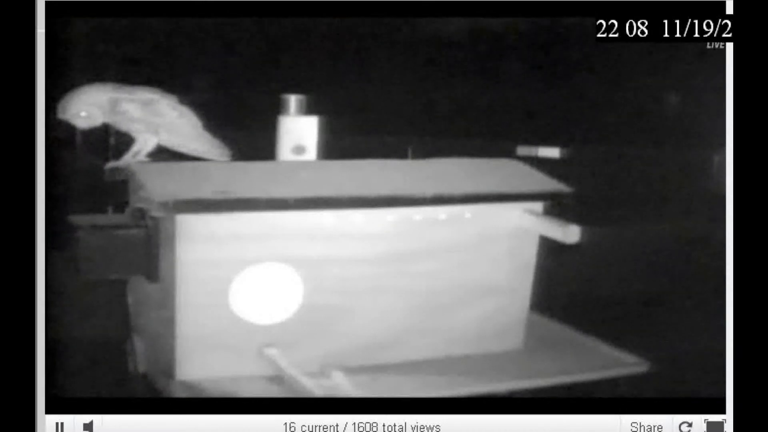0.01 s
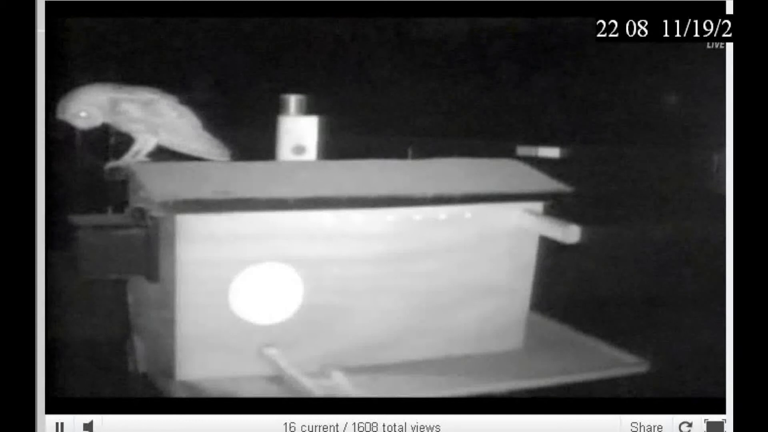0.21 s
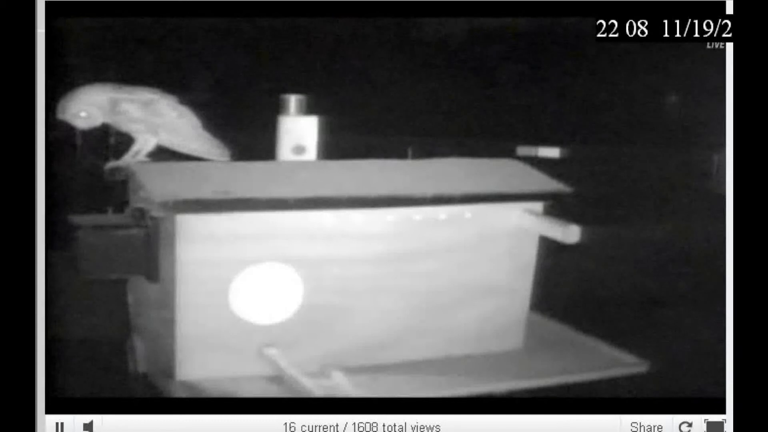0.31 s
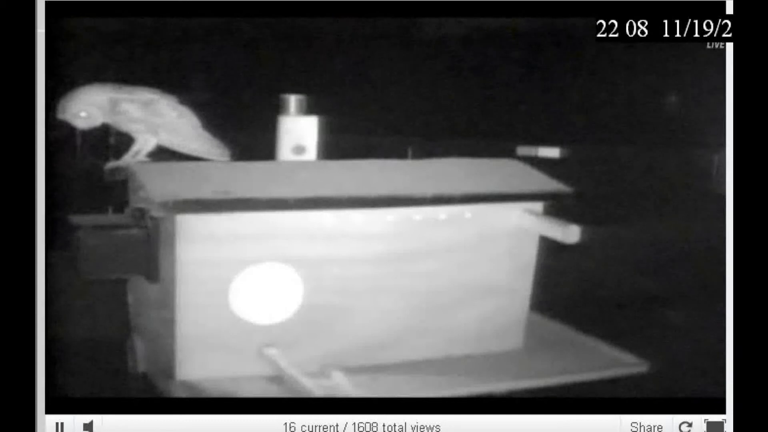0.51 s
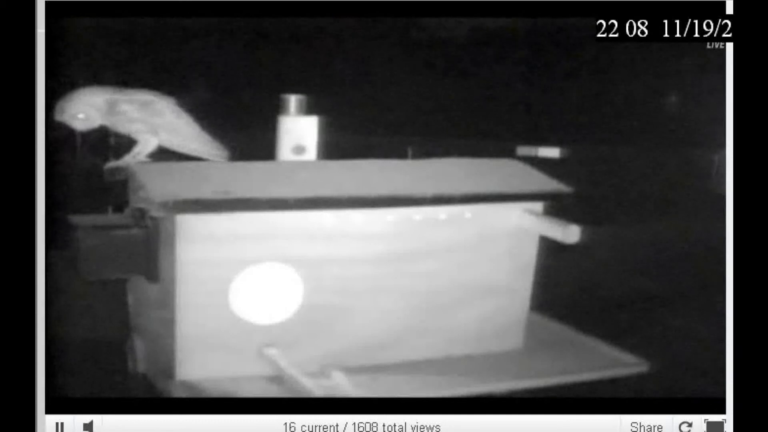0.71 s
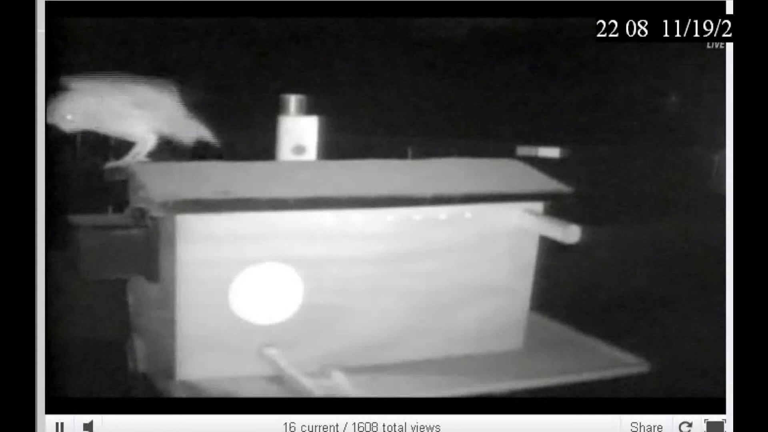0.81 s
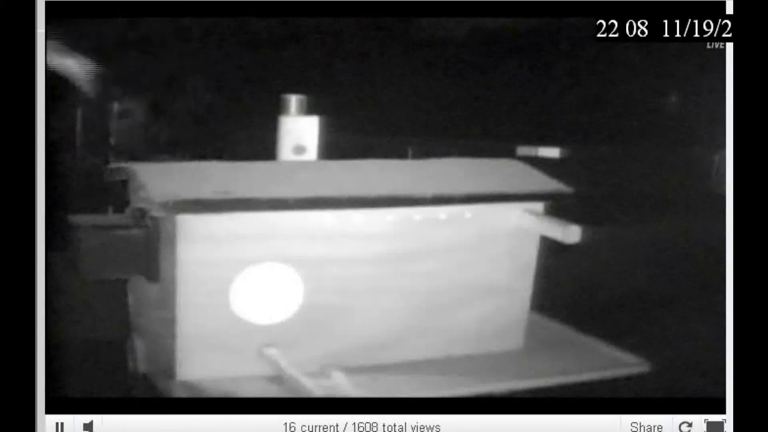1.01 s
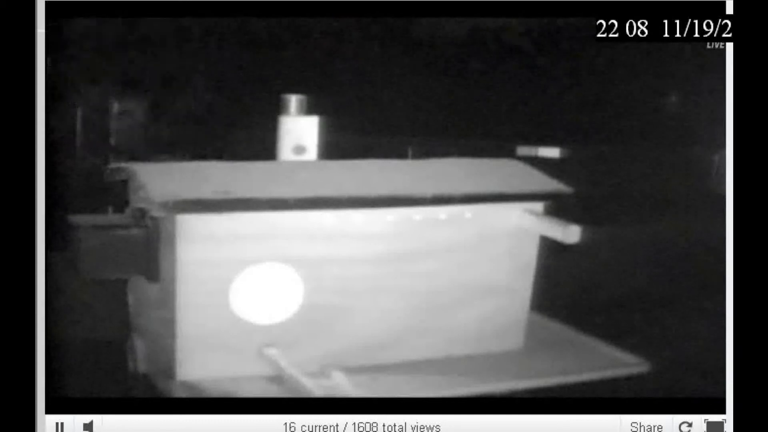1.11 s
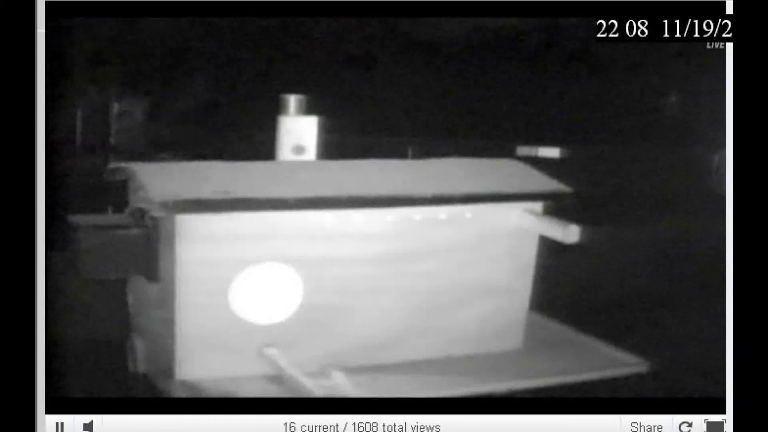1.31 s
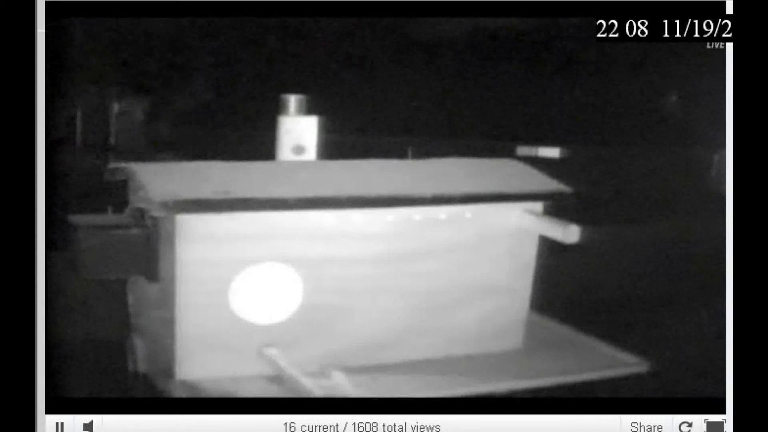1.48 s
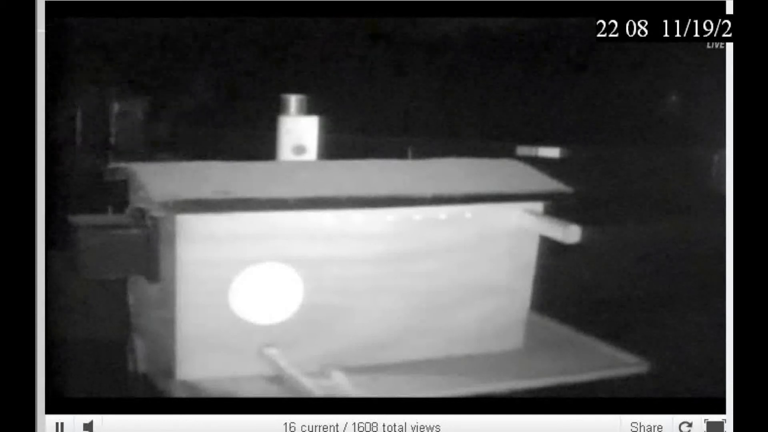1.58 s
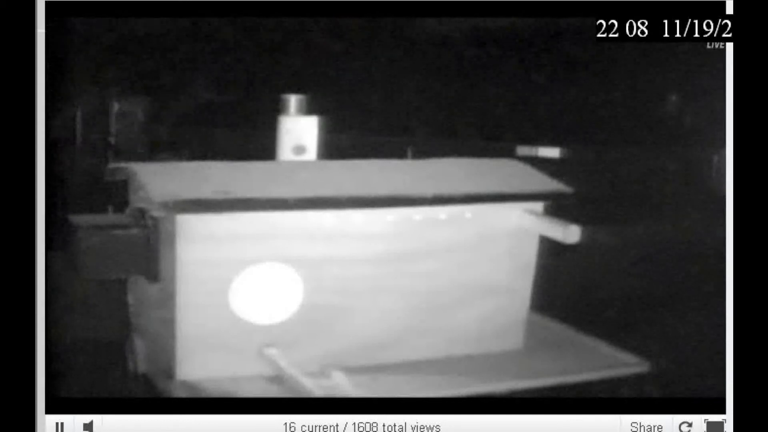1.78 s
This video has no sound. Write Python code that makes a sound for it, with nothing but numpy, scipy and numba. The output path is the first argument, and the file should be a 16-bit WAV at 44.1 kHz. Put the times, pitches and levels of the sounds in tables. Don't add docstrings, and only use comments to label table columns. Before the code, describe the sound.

Loud overloaded thump on a wooden nest box as an owl pushes off, talons scraping

```python
import sys
import numpy as np
from scipy import signal
from scipy.fft import rfft, irfft
from scipy.io import wavfile
from scipy.ndimage import uniform_filter1d
from numba import njit

SR = 44100
rng = np.random.default_rng(int(sys.argv[2]) if len(sys.argv) > 2 else 0)


def bounce(signal):
    frames = np.transpose(np.atleast_2d(signal))
    limited = np.clip(frames, -1, 1)
    pcm = np.round(limited * 32767).astype(np.int16)
    wavfile.write(sys.argv[1], SR, pcm)


def ratio_of_db(decibels):
    return 10 ** (np.asarray(decibels, float) / 20)


N = 79380
T = np.arange(N) / SR


def level(x, db):
    return x * ratio_of_db(db) / np.sqrt(np.mean(x ** 2))


def curve(rows):
    return np.interp(T, *np.array(rows).T)


@njit
def svf(x, hz, width):
    y, b, l = np.empty(len(x)), 0., 0.
    for i in range(len(x)):
        g, k = np.tan(np.pi * hz[i] / SR), width / hz[i]
        v = (b + g * (x[i] - l)) / (1 + g * (g + k))
        b, l, y[i] = 2 * v - b, l + 2 * g * v, k * v
    return y


def band(x, hz, width):
    return svf(x, np.full(N, 1. * hz), 1. * width)


def butter(x, hz, kind, order):
    sos = signal.butter(order, hz, kind, fs=SR, output="sos")
    settled = signal.sosfilt_zi(sos) * x[0] * (kind == "low")
    return signal.sosfilt(sos, x, zi=settled)[0]


def walk(rate):
    k = int(SR / rate)
    steps = np.repeat(rng.standard_normal(N // k + 1), k)
    return 1.3 * uniform_filter1d(uniform_filter1d(steps, k), k)[:N]


def shape(start, rise, hold, t60):
    u = T - start
    return np.clip(u / rise, 0, 1) * ratio_of_db(-60 * np.maximum(u - hold, 0) / t60)


def pulse(s, ms):
    def edge(at):
        return np.clip((T - at) * SR / 2 + .5, 0, 1)
    return edge(s) - edge(s + ms / 1000)


# pitch_hz, level_db (per Hz)
HISS_COLOUR = [(24, -40), (40, -13.5), (159, 0), (379, -31), (702, -44), (756, -24.5), (14600, -24)]
# time_s, pitch_hz
WHINE_PITCH = [(0, 11540), (.42, 11000), (.47, 8660), (.5, 9800), (.53, 13680), (.552, 9650), (.6, 11680),
               (.686, 10900), (.79, 11660), (1.244, 11900), (1.8, 11710)]


def line_input():
    freqs, colour = np.maximum(np.fft.rfftfreq(N, 1 / SR), 1), np.array(HISS_COLOUR)
    tilt = ratio_of_db(np.interp(np.log(freqs), np.log(colour[:, 0]), colour[:, 1]))
    hiss = level(irfft(rfft(rng.standard_normal((2, N))) * tilt, N), -69.5)
    wander_hz = 1700 * walk(150) * (T < .45)
    centre = np.clip(curve(WHINE_PITCH) + wander_hz, 7000, 14000)
    early = .6
    settle = early + (1 - early) * shape(.53, .1, 9, 1)
    whine = level(svf(rng.standard_normal(N), centre, 730.), -78) * settle
    top_edge = signal.ellip(8, .3, 60, 14500, fs=SR, output="sos")
    thin_tone = ratio_of_db(-83) * np.sin(2 * np.pi * 5870 * T)
    return signal.sosfilt(top_edge, hiss + whine) + thin_tone


# pitch_hz, width_hz, level_db
AIR = [(91, 41, -11), (121.6, 7.6, 0.5), (182.5, 8.7, -2), (222.5, 24.6, -3.5), (300, 40, -15.5),
       (363.2, 21, -6.5), (500, 34, -34.5), (744, 13, -14.5), (869, 18, -12), (1048, 18, -17),
       (1183, 22, -17.5), (1534, 220, -30.5), (2259, 3100, -37)]
# time_s, level_db
SHAKE = [
    (0, 7),
    (.13, 12),
    (.3, 12),
    (.5, 10),
    (.6, 12.5),
    (.9, 5),
    (1.8, 3.5),
]


def air():
    shake_db, shake_top_hz, flicker_db = curve(SHAKE), 400, 1
    hum = 0
    for hz, width, db in AIR:
        swell_db = shake_db / (1 + (hz / shake_top_hz) ** 4)
        loudness = ratio_of_db(db + flicker_db * walk(21) + swell_db)
        hum = hum + loudness * band(rng.standard_normal(N), hz, width)
    rumble = level(butter(rng.standard_normal(N), 44.6, "low", order=2), -65.5)
    return hum * ratio_of_db(-31) + rumble * (.1 + shape(-1, 1, 1.58, .1))


# pitch_hz, width_hz, level_db
LOOSE = [
    (75.4, 18, -9.5),
    (113.4, 70, 3.5),
    (162, 160, 2),
    (193, 66, -6),
]
# time_s, level_db
RATTLE = [
    (0, -33),
    (.05, -43.5),
    (.13, -43.5),
    (.2, -31),
    (.29, -26.5),
    (.42, -37),
    (.49, -42),
    (.56, -55),
    (.7, -54),
]


def rattle():
    boom = 0
    for hz, width, db in LOOSE:
        boom = boom + ratio_of_db(db) * band(band(rng.standard_normal(N), hz, width), hz, width)
    return ratio_of_db(curve(RATTLE)) * level(butter(boom, 270, "low", order=3), 0)


# start_s, level_db (peak), pitch_hz, held_s, t60_s
TIN = [
    (.244, -53, 5820, .022, .14),
    (.268, -60, 5570, .024, .05),
    (.25, -65, 5480, .02, .06),
    (.316, -69, 5700, .012, .05),
    (.398, -57, 6030, .012, .025),
    (.564, -50, 6000, .012, .02),
    (.566, -49, 5050, .011, .02),
]


def tin():
    out = 0
    for start, db, hz, hold, t60 in TIN:
        loudness = ratio_of_db(db + 2 * walk(150)) * shape(start, .003, hold, t60)
        pitch = hz * (1 + .004 * walk(60))
        out = out + loudness * np.sin(2 * np.pi * np.cumsum(pitch) / SR)
    return out


def grains():
    hits = rng.random(N) < 12000 / SR
    sizes = ratio_of_db(1.5 * rng.exponential(size=N)) * rng.standard_normal(N)
    return level(hits * sizes, 0)


# start_s, length_s, level_db, brightest_hz, breadth_octaves
SCRAPES = [(0.146, 0.031, -46, 650, .7), (0.148, 0.0081, -57, 1900, 1.2), (0.195, 0.015, -53.5, 2500, 1.5),
           (.205, .012, -41, 3600, 3.7), (0.212, 0.028, -35.5, 2500, 2.6), (0.23, 0.016, -53, 2500, 1.2),
           (0.24, 0.0043, -34, 500, 1.1), (.394, 0.024, -58.5, 5320, 0.64), (.402, 0.0079, -60, 3800, 0.19),
           (0.41, 0.027, -71, 4196, .8), (0.393, 0.053, -60.5, 1900, 0.47), (.395, 0.016, -55.5, 720, 0.3),
           (0.561, 0.012, -45, 1650, 0.68), (0.558, 0.024, -55, 3500, 1.7), (0.578, .03, -62, 3500, 1.3),
           (0.561, 0.014, -52, 5460, 0.47), (0.57, 0.05, -47.5, 745, 0.061),
           (0.607, 0.049, -58.5, 3500, 0.88), (0.603, 0.028, -50.5, 3590, .1), (0.66, 0.03, -63, 444.4, .5),
           (0.584, 0.019, -49.5, 3170, 0.28), (0.609, .042, -47, 2850, 0.17),
           (0.615, 0.024, -61.5, 5028, 0.31), (0.697, 0.035, -57, 1710, 0.38),
           (0.692, 0.018, -66.5, 6048, 0.3), (0.817, 0.02, -70, 5230, 0.62)]
# pitch_hz, width_hz, level_db
WOOD = [(372, 60, -1), (500, 48, 0), (745, 15, 10), (858.5, 16, 1), (1090, 17, -2.5), (1425, 47, 6),
        (1900, 100, 1.5), (2053, 130, -7), (2850, 71, -3.5), (3590, 91, -1.5), (4230, 110, -9.5),
        (5120, 150, -3), (5647, 75, -1), (5960, 33, -7.5)]


def talons():
    out, common, flutter = 0, grains(), ratio_of_db(1.2 * walk(150))
    shared = .6
    rise_s, fall_t60_s = .003, .042
    for hz, width, db in WOOD:
        force = 0
        for start, length, scrape_db, brightest, breadth in SCRAPES:
            nearness = np.exp(-.5 * (np.log2(hz / brightest) / breadth) ** 2)
            force = force + ratio_of_db(scrape_db) * shape(start, rise_s, length, fall_t60_s) * nearness
        push = force * flutter * (shared * common + np.sqrt(1 - shared ** 2) * grains())
        pitch = hz * (1 + .012 * walk(40))
        ring = band(svf(push, pitch, 2. * width), hz, 6 * width)
        raw_scrape = band(band(push, hz, hz / 3), hz, hz / 2)
        out = out + ratio_of_db(db + 13) * ring + ratio_of_db(-.5) * raw_scrape
    return out


# start_s, level_db (peak), pitch_hz, held_s, t60_s once released
PANEL_BLOWS = [
    (.2086, -12, 205, .005, .01),
    (.2135, -2.5, 198, .0198, .006),
    (.2370, -6, 200, .0125, .05),
    (.2442, -6.5, 115, .047, .035),
    (.2566, -6.5, 170, .0115, .03),
    (-.0062, -24, 200, .022, .07),
    (-.0135, -28, 120, .025, .1),
               (0.21, -16, 110, 0.0047, 0.018), (0.21, -14, 94, 0.0055, 0.016), (0.57, -45.5, 393, 0.016, 0.031),
         (.64, -47, 385, 0.017, .04), (0.16, -35.5, 173, 0.012, 0.07), (0.2, -33.5, 135.5, 0.033, 0.11),
         (0.26, -19.5, 370, 0.0011, 0.03), (.150, -38, 382, 0.015, .04), (.150, -45, 734, 0.012, .03),
         (.163, -48, 870, 0.012, .03), (0.6, -56, 890, 0.016, .03), (.585, -55.5, 900, .03, .03),
         (0.26, -17.5, 490, 0.0034, 0.023), (.396, -51.5, 730, 0.0093, .03), (.566, -47, 470, 0.015, 0.045),
         (.583, -44.5, 745, 0.045, 0.069), (.705, -54, 745, 0.027, 0.079),
         (0.3045, -22.5, 181.4, 0.0036, 0.092), (0.32, -14, 178, 0.018, 0.057),
         (0.36, -25, 115, 0.032, 0.17), (0.37, -24, 199, 0.018, 0.12), (.42, -37, 393, 0.02, 0.012),
         (0.42, -21.5, 156, .018, 0.038), (0.44, -23, 114, 0.033, 0.092), (0.28, -42.5, 373, 0.028, .05),
         (0.43, -36, 203, 0.024, 0.068), (0.49, -39, 123, 0.024, .06), (.783, -45, 210, 0.012, 0.033),
         (.828, -45, 126, 0.042, 0.071), (0.66, -48.5, 120, .03, .06), (1.462, -43, 237, 0.018, 0.059)]


def panels():
    out = 0
    for start, db, hz, hold, t60 in PANEL_BLOWS:
        out = out + ratio_of_db(db) * shape(start, .0045, hold, t60) * np.sin(2 * np.pi * hz * (T - start))
    return out


def scene():
    box = panels() + rattle() + talons() + tin() + air()
    return np.array([box, box])


# start_s, length_ms, size (signed)
FLIPS = [
    (.2172, .45, .85),
    (.22285, .46, 1.4),
    (.2326, .82, -.22),
    (.2337, .3, -.25),
    (.2340, 4.5, .55),
    (.2357, .3, -.3),
    (.2387, .3, -.3),
    (.2390, 2.97, .3),
    (.2414, .2, -.15),
    (.2417, .27, .2),
]
# start_s, size (signed), recovery_ms
JUMPS = [
    (.23342, .6, .25),
    (.2340, -.4, 1),
    (.23632, -1.15, .33),
    (.2390, .4, .25),
    (.24197, -.5, .5),
]


def flips():
    feed_delay_s, out = .00012, 0
    for start, size, ms in JUMPS:
        out = out + size * shape(start - feed_delay_s, 2 / SR, 0, np.log(1000) * ms / 1000)
    for start, ms, size in FLIPS:
        out = out + size * pulse(start - feed_delay_s, ms)
    return out


def narrow_feed(box):
    jumps = flips()
    feed = butter(np.clip(box, -.95, .72) + jumps, 15, "high", order=1)
    mirror = butter(feed * np.cos(2 * np.pi * 20660 * T), [13400, 14800], "band", order=4)
    sharp_edge = signal.ellip(8, .3, 60, 7050, fs=SR, output="sos")
    settled = signal.sosfilt_zi(sharp_edge) * feed[0]
    body = butter(signal.sosfilt(sharp_edge, feed, zi=settled)[0], 8000, "low", order=1)
    leak = butter(jumps, [8200, 13000], "band", order=2)
    return body + ratio_of_db(-15.5) * mirror + ratio_of_db(-23) * leak


def stereo(feed):
    quiet_db, loud_db = -2.5, -3
    loudness = np.clip(uniform_filter1d(np.abs(feed), size=900) / .15, 0, 1)
    left = ratio_of_db(quiet_db + (loud_db - quiet_db) * loudness) * feed
    spike_s, sag_ms = .23324, .3
    spike = .9 * pulse(spike_s, .105)
    sag = -.3 * pulse(spike_s - sag_ms / 1000, sag_ms)
    return np.array([left, feed + spike + sag])


def roll_off(x):
    return signal.sosfilt(signal.butter(12, 19500, fs=SR, output="sos"), x)


def record(dry):
    mix = stereo(narrow_feed(dry[0])) + line_input()
    return roll_off(np.clip(mix, -1, 1))


dry = scene()
out = record(dry)
bounce(out)
```